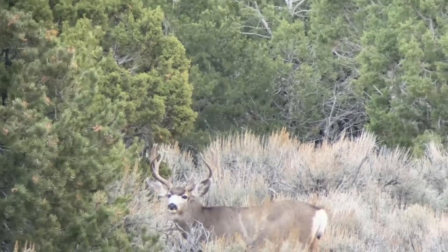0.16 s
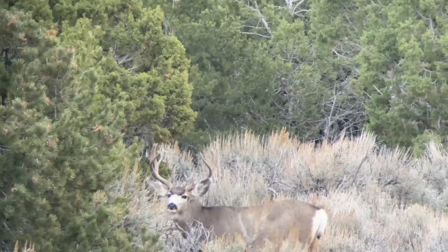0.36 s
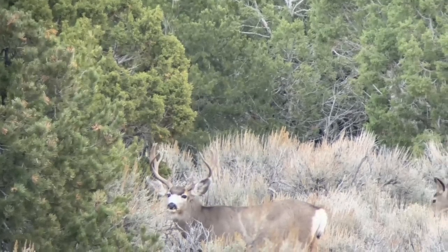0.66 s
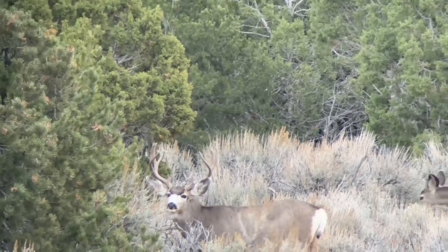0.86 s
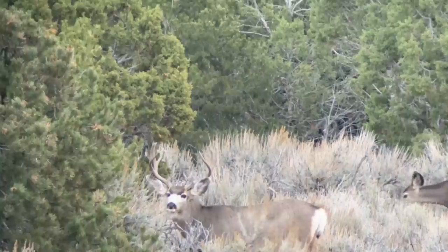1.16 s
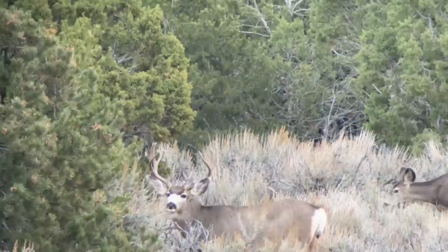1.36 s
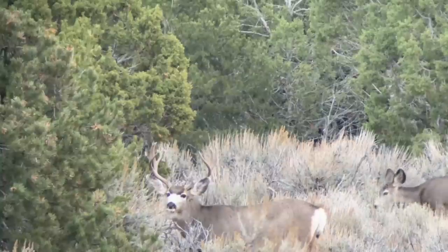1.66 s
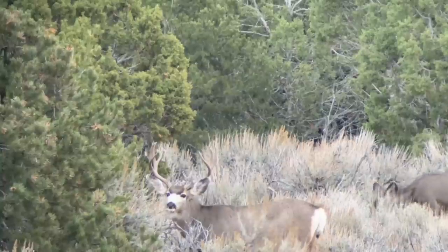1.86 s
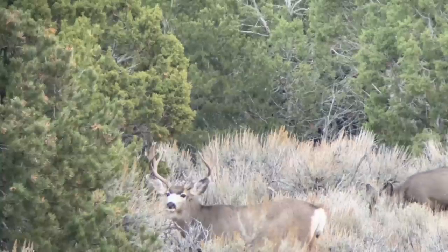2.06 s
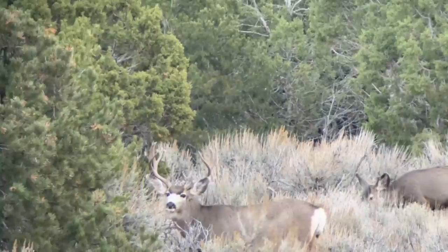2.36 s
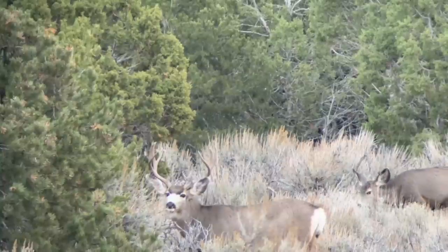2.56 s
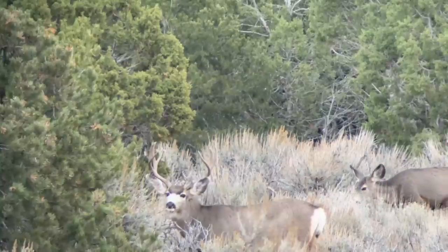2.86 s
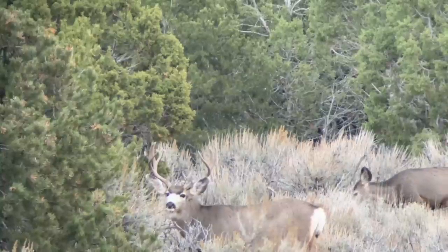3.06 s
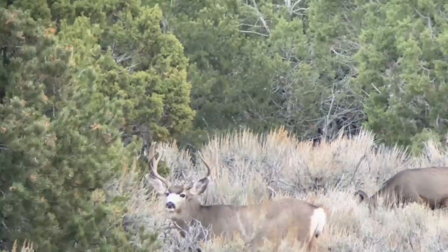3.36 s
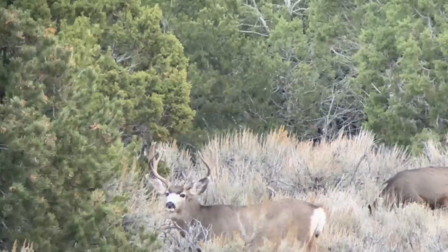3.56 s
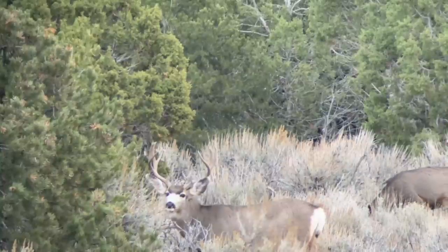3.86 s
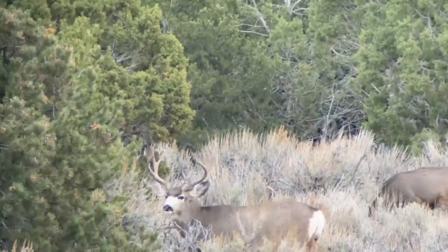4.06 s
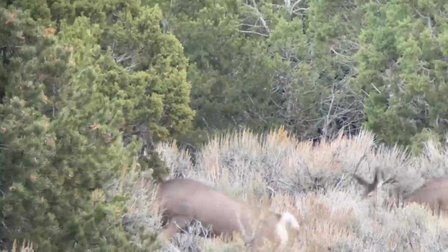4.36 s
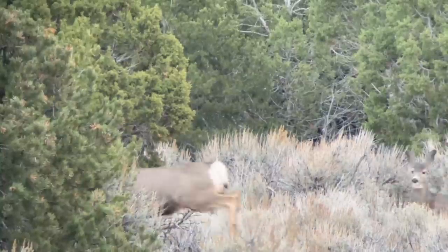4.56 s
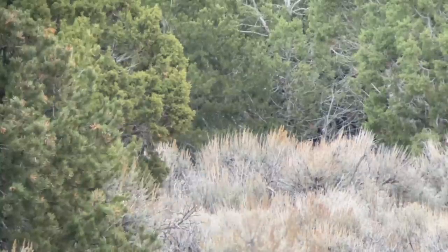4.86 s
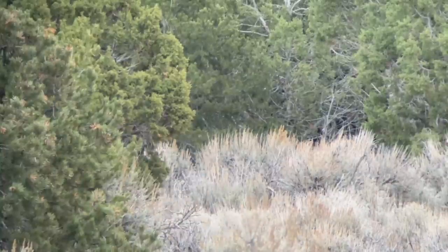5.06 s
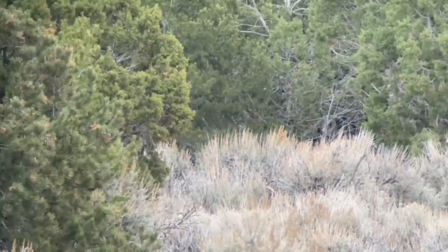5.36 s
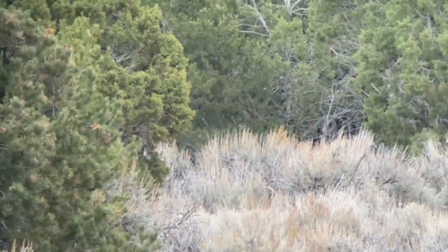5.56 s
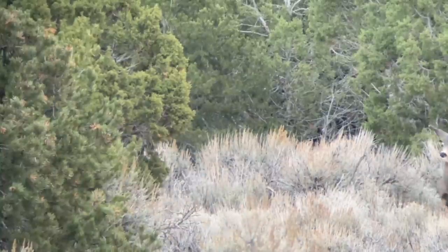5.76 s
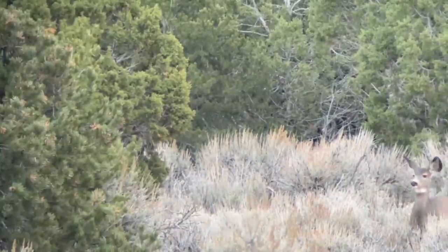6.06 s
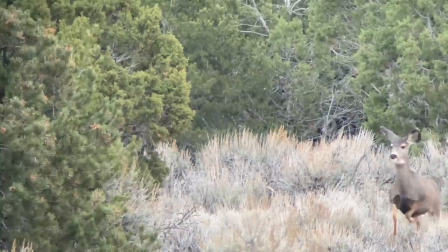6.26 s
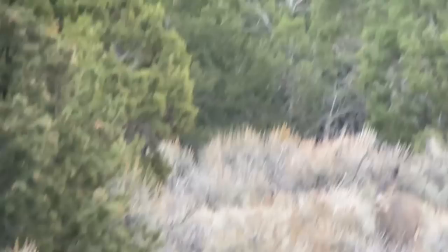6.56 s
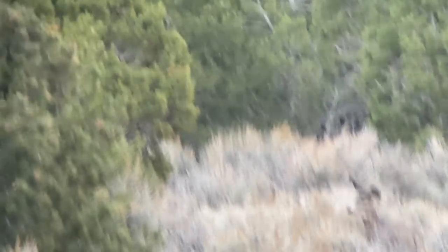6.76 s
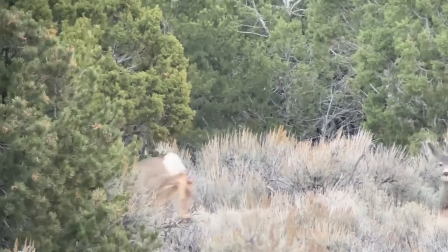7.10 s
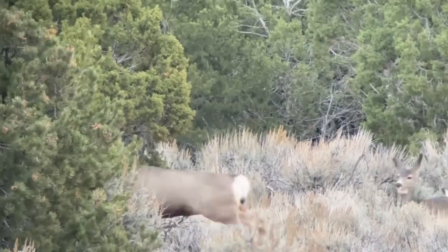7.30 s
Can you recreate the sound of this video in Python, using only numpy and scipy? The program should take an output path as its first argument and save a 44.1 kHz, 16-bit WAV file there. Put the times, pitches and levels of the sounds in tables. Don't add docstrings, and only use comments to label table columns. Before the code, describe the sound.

Outdoors in brushy country, a phone microphone picks up a steady idling engine and low wind bumps. One loud rifle shot snaps out, slightly clipped, with a deep boom and a scattering of woody, ringing reflections that fade into the idle. Later, fabric slides and rubs close to the microphone. In the last half second the background turns mono and softer, playing backwards.

```python
import sys
import numpy as np
from scipy import signal
from scipy.fft import rfft, irfft, next_fast_len
from scipy.io import wavfile
from scipy.ndimage import map_coordinates

SR = 44100
rng = np.random.default_rng(int(sys.argv[2]) if len(sys.argv) > 2 else 0)


def voltage_ratio(level):
    return 10 ** (np.asarray(level, float) / 20)


def output_pcm(signal):
    pcm = np.clip(np.atleast_2d(signal).T, -1, 1) * 32767
    wavfile.write(sys.argv[1], SR, np.round(pcm).astype(np.int16))


N = 327663
FIRED = 3.9323

# (frequency [Hz], level [dB per Hz])
TREES = [(1060, -35), (1700, -26), (1860, -20.5), (2050, -5), (2220, -6.5), (2410, -3), (2620, -1),
         (3000, -4), (3400, -10.5), (3770, -16), (4110, -21.5), (5000, -20.5), (6500, -29.5), (11000, -120)]
LEAVES = [(2940, -39), (4200, -6), (5000, -12), (6000, -18), (6800, 3), (7500, -6.5), (8500, -5),
          (9500, -9.5), (10500, -26), (12000, -44), (13500, -26), (15500, -44)]
ROCKS = [(720, -46), (1220, -13), (1370, -4), (1530, 3.5), (1750, -7), (1950, -8.5), (2540, -50.5),
         (4290, -120)]
# (frequency [Hz], right over left [dB], right phase lead [turns], likeness [0-1])
HIGH = [(2600, 0, -.08, .98), (3100, 0, -.09, .98), (4400, 0, -.03, .94), (5800, 0, -.04, .92),
        (6700, 0, -.1, .96), (7150, 0, -.22, .92), (7500, 0, -.51, .98), (7850, 0, -.82, .93),
        (8500, 0, -.97, .95), (9300, 0, -.86, .85), (9800, 0, -.72, .8), (10300, 0, -.5, .995),
        (12300, 0, -.5, .995), (13450, 0, 0, 1)]
# (frequency [Hz], right over left [dB], right phase lead [turns], likeness [0-1])
FAR_SIDE = [(50, 2.4, -1.007, 0.83), (400, 0.5, -1.05, 0.87), (690, 0.5, -1.0, 0.57),
            (930, 2.5, -.99, 0.94), (1200, 4.0, -0.75, 0.55), (1500, 5.4, -.95, 0.95),
            (1800, 4, -.48, 0.44), (2100, .4, 0.00073, 1.0)] + HIGH


def unit(x):
    return x / np.sqrt(np.mean(x ** 2) + 1e-20)


def along(points, hz):
    f, *cols = np.transpose(points)
    return [np.interp(np.log(hz + 1), np.log(f + 1), c) for c in cols]


def curves(rows, quiet=None):
    s, *cols = np.transpose(rows)
    return [np.interp(np.arange(N) / SR, s, c, quiet, quiet) for c in cols]


def wobble(rate):
    knots = rng.standard_normal(int(N * rate / SR) + 4)
    return map_coordinates(knots, [np.arange(N) * rate / SR])


def filtered(x, response):
    m = next_fast_len(N + SR // 2)
    return irfft(rfft(x, m) * response(np.fft.rfftfreq(m, 1 / SR)), m)[..., :N]


def coloured(x, spectrum):
    gain = lambda hz: voltage_ratio(along(spectrum, hz)[0])
    noise_power = np.mean(gain(np.linspace(0, SR / 2, num=8000)) ** 2)
    return filtered(x, gain) / np.sqrt(noise_power)


def resonant(modes):
    def response(f):
        total = 0
        for k, (centre, width, db) in enumerate(modes):
            damping = 1j * f * width
            total = total + (-1) ** k * voltage_ratio(db) * damping / (centre * centre - f * f + damping)
        return total
    return response


def pair():
    return rng.standard_normal((2, N))


def steer(x, side):
    def to_left(hz):
        return voltage_ratio(-along(side, hz)[0] / 2)

    def to_right(hz):
        db, turns, alike = along(side, hz)
        alike = np.clip(alike, 0, 1)
        return voltage_ratio(db / 2) * np.exp(2j * np.pi * turns) * [alike, np.sqrt(1 - alike ** 2)]
    return np.array([filtered(x[0], to_left), filtered(x, to_right).sum(0)])


def pings(rows, rise, fall, sag):
    s, db, hz = np.transpose(rows)[..., None]
    t = np.arange(-round(3 * rise * SR), round(3 * fall * SR)) / SR
    shape = voltage_ratio(db) * np.exp(-(t / np.where(t < 0, rise, fall)) ** 2 / 2)
    phase = 2 * np.pi * (rng.random((len(rows), 1)) + hz * (t - sag * t ** 2 / 2))
    at = (np.round(s * SR) + np.round(t * SR)).astype(int).ravel()
    return np.array([np.bincount(at, (shape * wave(phase)).ravel(), N) for wave in (np.cos, np.sin)])


def turned():
    start_s, long_s, loss_db = 5.62, 0.95, -4
    return voltage_ratio(loss_db * np.clip((np.arange(N) / SR - start_s) / long_s, 0, 1))


def engine():
    # (time [s], beat of the engine [Hz])
    shaft = [(0, 17.002), (2.5, 17.002), (2.9, 16.93), (5.8, 16.93), (6.2, 17.0), (7.5, 17.0)]
    # (time [s], level [dB])
    load = [(0, 0), (.3, -2), (1.2, 1.5), (1.8, -0.5), (2.59, 1), (3.08, -3.5), (3.28, 5), (3.45, 0),
            (3.57, -4), (3.77, -1), (3.95, 2), (4.1, -2), (4.69, 0), (6.18, -2), (6.32, 2), (6.67, -1),
            (6.87, 2), (7.05, -5.5)]
    # (multiple of the engine's beat, level [dB])
    weak_orders = [(2, -68), (11 / 3, -60), (5.27, -56), (6, -63), (10, -59.5)]
    cylinders = [13, 16.5, 12, 14.2, 9.9, 14.3]
    # (frequency [Hz], level [dB per Hz])
    clatter_tone = [(2310, -39.5), (3300, -5), (4000, -28), (4700, -1), (6000, -3), (6700, 3.5), (7500, 0),
                    (8100, 4), (8600, -12), (9500, -15), (10500, -6.5), (12000, -37.5), (13500, -29),
                    (15500, -24)]
    drone_tone = [(200, 0.0), (350, -3.5), (850, -6.5), (1300, -8.5), (1800, -10), (2100, -12),
                  (2500, -7.5), (2900, -13), (3200, -28), (4000, -24.5), (7500, -17.5), (10000, -31.5),
                  (12000, -43), (13200, -41), (14300, -31.5), (15500, -30.5)]
    # (frequency [Hz], right over left [dB], right phase lead [turns], likeness [0-1])
    engine_side = [(50, -21.5, 1.0, 0.96), (250, 4.0, 0.95, 0.87), (816, -6.5, 0.8, 0.85),
                   (1327, 2.0, 0.55, 0.75), (1900, 20.5, 0.093, 0.95), (1953, 2.0, 0.051, 0.65)] + HIGH

    cycle = .0503 + np.cumsum(curves(shaft)[0]) / SR / 3
    beat = 2 * np.pi * 3 * cycle
    load_db, = curves(load)
    third_db = -37.5 + load_db
    fourth_db = -42 - .4 * load_db + 2 * wobble(5.1)
    tones = voltage_ratio(third_db) * np.cos(3 * beat)
    tones += voltage_ratio(fourth_db) * np.cos(4 * beat - 2 * np.pi * .68)
    for order, db in weak_orders:
        tones += voltage_ratio(db + 1.3 * wobble(3.7)) * np.cos(order * beat + 0.25 * wobble(2.99))

    firing = 6 * cycle + 5.92
    since, number = firing % 1, firing.astype(int)
    uneven_db = 1.24 * rng.standard_normal(number[-1] + 1)[number]
    strength_db = np.array(cylinders)[number % 6] + uneven_db
    gate = voltage_ratio(strength_db) * since * np.exp(-since / 0.22)
    clatter = voltage_ratio(-57.5) * turned() * coloured(unit(gate) * pair(), clatter_tone)
    drone = voltage_ratio(-50 + 0.28 * wobble(9.3)) * turned() ** 0.15 * coloured(pair(), drone_tone)
    return np.sqrt(2) * tones * voltage_ratio([[-.3], [.3]]) + steer(clatter + drone, engine_side)


def wind():
    # (time [s], rise [dB], half length [s])
    gusts = [
        (0.266, 13, 0.045),
        (0.742, 12, 0.086),
        (1.73, -5, 0.039),
        (2.87, 0, 0.05),
        (3.25, 5.5, 0.032),
        (3.473, 1.5, 0.054),
        (5.494, 6.5, 0.026),
        (5.827, -2.5, 0.033),
        (6.325, 7.5, 0.066),
    ]
    # (frequency [Hz], level [dB per Hz])
    buffet = [(13, -41), (22, -10.5), (48, -6), (69, -5.5), (84, -5.5), (124, -12.5), (178, -16),
              (231, -29.5), (300, -41.5), (390, -37.5), (660, -120)]

    t = np.arange(N) / SR
    gusts_db = sum(db * np.exp(-((t - s) / half) ** 2) for s, db, half in gusts)
    wind_db = -50.5 + gusts_db + 2.5 * wobble(1.36) + wobble(14)
    wind_db = np.minimum(wind_db, -43.5)
    return steer(voltage_ratio(wind_db + 7.5) * turned() * coloured(pair(), buffet), FAR_SIDE)


def falling_boom(t):
    full_s, top_s = .0048, .0107
    swell_db = -1.5 - 990 * np.clip(top_s - t, 0, None)
    swell_db -= 23000 * np.clip(full_s - t, 0, None)
    swell_db -= 1190 * np.clip(t - top_s, 0, None)
    return voltage_ratio(swell_db) * (t > 1e-4) * np.cos(9.1 * np.log(t / .0109))


def ground_thud(t):
    # (frequency [Hz], level [dB], time to fall 60 dB [s])
    ground = [(444, -2.3, .021), (652, -15.5, .046), (1000, -6.5, .013)]
    late_s, rise_s = .00146, .0009
    ringing = sum(voltage_ratio(db - 60 * t / t60) * np.cos(2 * np.pi * hz * (t - late_s)) for hz, db, t60 in ground)
    thud = ringing * np.clip(t / rise_s, 0, 1) ** 2
    return thud + voltage_ratio(-14.5) * np.roll(thud, -round(.0182 * SR))


def brush_spray(fronts, edges):
    fading = voltage_ratio(-60 * np.arange(SR // 20) / SR / 0.018)

    def scatter(x, spectrum):
        return coloured(signal.fftconvolve(x, fading)[:N] * rng.standard_normal(N), spectrum)
    spray = voltage_ratio(-36.0) * scatter(fronts, TREES)
    spray += voltage_ratio(-39.0) * scatter(fronts, ROCKS)
    return spray + voltage_ratio(-39.5) * scatter(edges, LEAVES)


def shot():
    # (time [s], peak [dB], treble [dB])
    cracks = [
        (3.9138, -1.5, -24),
        (3.9172, -12, -24),
        (3.9319, .5, -6),
        (3.93303, -6, -2),
        (3.9352, -20, 10),
        (3.9368, -9.5, -9),
        (3.951, -23, -12),
        (3.9578, -17, -1),
    ]
    # (frequency [Hz], width [Hz], level [dB])
    snap = [(2690, 350, 3), (1500, 250, -11), (3450, 440, -34)]
    whip = [(2500, 360, 6), (1450, 310, 0), (4950, 410, -15), (8500, 900, -17)]
    edge = [(4660, 500, -5), (6650, 300, 1.5), (8970, 1400, -3.5), (14000, 1800, -36)]
    # (frequency [Hz], level [dB])
    dip = [(220, 0), (290, -8.5), (370, -1), (450, 0), (9900, 0), (10700, -22), (11500, -22), (12200, -4),
           (15500, -6)]
    # (frequency [Hz], right over left [dB], right phase lead [turns], likeness [0-1])
    shot_side = [(50, .5, -1, 1), (200, .5, -1, 1), (330, 5, -.98, 1), (520, 1, -.96, 1), (950, 3, -.97, 1),
                 (1200, 8, -.75, 1), (1500, 7, -.9, 1), (1800, 5, -.52, 1), (2100, -3, -.1, 1)] + HIGH

    fronts, edges = np.zeros((2, N))
    for s, db, treble_db in cracks:
        fronts[round(s * SR)] = voltage_ratio(db + 19.5)
        edges[round(s * SR)] = voltage_ratio(db + treble_db + 16.0)
    whips = fronts * (np.arange(N) < (FIRED - .01) * SR)
    body = filtered(fronts - whips, resonant(snap)) - filtered(whips, resonant(whip))
    body = filtered(body, lambda hz: 1 / (1 + 1j * hz / 6000))
    t = np.clip(np.arange(N) / SR - FIRED, 1e-4, None)
    blast = body + filtered(edges, resonant(edge)) + falling_boom(t) + ground_thud(t)
    blast = blast + brush_spray(fronts, edges)
    blast = filtered(blast, lambda hz: voltage_ratio(along(dip, hz)[0]))
    return steer(np.array([blast, 0 * blast]), shot_side)


def roll():
    # (time [s], level [dB])
    rolling = [(3.95, -17), (3.97, -23.5), (4.04, -28.5), (4.25, -30), (4.28, -30), (4.335, -37),
               (4.6, -33.5), (4.72, -39.5), (5.2, -44)]
    # (frequency [Hz], level [dB per Hz])
    deep_tone = [(35, -36), (60, -17), (70, -8), (107, -3.5), (170, -7.5), (220, -38), (370, -120)]
    upper_tone = [(80, -120), (140, -42), (165, -7.5), (192, 14), (235, -4.5), (265, -8.5), (310, -51),
                  (500, -120)]
    knock_tone = [(160, -49.5), (280, -21.5), (328, -7.5), (414, 1), (450, -12.5), (553, -3), (800, -18.5),
                  (1040, -40), (1760, -120)]
    # (time [s], level [dB], frequency [Hz])
    slope_thumps = [(3.988, -19, 160), (4.0112, -25, 180), (4.049, -25, 186), (4.0722, -26, 200),
                    (4.0838, -24, 104), (4.1448, -23.5, 148), (4.1854, -29, 118), (4.2144, -28.5, 178),
                    (4.2405, -39, 88), (4.2812, -21, 132), (4.3102, -29, 141), (4.3508, -36, 154),
                    (4.3741, -38, 121), (4.4234, -32.5, 150), (4.464, -31.5, 103), (4.4902, -29, 122),
                    (4.5569, -29, 130), (4.6034, -51, 295), (4.6382, -32, 138), (4.1, -27, 181),
                    (4.164, -27, 215)]
    # (frequency [Hz], right over left [dB], right phase lead [turns], likeness [0-1])
    roll_side = [(60, .5, 0, 0.97), (220, 0.67, 0.013, 0.99), (500, 0.86, 0.011, 0.49)]

    swell = np.clip((np.arange(N) / SR - 3.96) / .03, 0, 1)
    deep_db, = curves(rolling, quiet=-120)
    after = np.arange(N) / SR - rolling[0][0]
    upper_db = deep_db + 5.5 - 22 * after
    knock = voltage_ratio(-24.5 - 60 * after.clip(0) / 0.19) * (after > 0)
    knock = knock + swell * voltage_ratio(deep_db - 22.5)
    rumble = voltage_ratio(deep_db) * coloured(pair(), deep_tone) + voltage_ratio(upper_db) * coloured(pair(), upper_tone)
    thumps = voltage_ratio(2) * pings(slope_thumps, rise=0.005, fall=0.0066, sag=6.5)
    low = thumps + voltage_ratio(-4) * swell * rumble + knock * coloured(pair(), knock_tone)
    return steer(low, roll_side)


def shares(s, colour, narrow_db):
    parts_db = -narrow_db * (np.arange(4) - colour) ** 2
    return parts_db + [0, 0, 0, -13 + narrow_db - 31 * (s - FIRED)]


def returns():
    # (time [s], level [dB], rise [s], time to fall 60 dB [s],
    # colour [0 slopes, 1 rocks, 2 trees, 3 leaves])
    stands = [(3.945, -23, 0.0028, 0.032, 0.45), (3.95, -26, 0.012, 0.32, 3.1),
              (3.957, -42.5, 0.0074, 0.76, 0.66), (4.023, -33, 0.23, 1.85, 2.08),
              (4.2, -28.5, 0.2, 0.63, 1.77), (4.28, -31.5, 0.035, 0.87, 1.48),
              (4.375, -38.5, 0.11, 0.82, 1.25), (4.43, -41.5, 0.099, 1.2, 1.25),
              (4.49, -31.5, 0.047, 0.63, 0.76), (4.533, -30.5, 0.033, 0.4, 1.06),
              (4.575, -33, .04, .15, 3.2), (4.633, -26, 0.018, 0.056, 1.55),
              (4.644, -28.5, 0.052, 0.028, .5), (4.679, -53, 0.033, 4.4, 0.42),
              (4.743, -50, .02, 0.04, 1.5), (4.841, -45, 0.093, 0.93, 0.69)]
    t, power = np.arange(N) / SR, np.zeros((4, N))
    for s, db, rise, t60, colour in stands:
        shape_db = db - 20 * np.clip(s - t, 0, None) / rise - 60 * np.clip(t - s, 0, None) / t60
        power += voltage_ratio(2 * shape_db) * (t > FIRED) * voltage_ratio(2 * shares(s, colour, 5.5))[:, None]
    return np.sqrt(power)


def echoes():
    # (frequency [Hz], level [dB per Hz])
    slopes = [(260, -63), (450, -12.5), (630, -2), (741, -10), (809, 2), (1110, 7.5), (1280, -2),
              (1660, -44), (2820, -120)]
    # (time [s], peak [dB], colour [0 slopes, 1 rocks, 2 trees, 3 leaves])
    slaps = [(4.149, -34, 2.3), (4.179, -25, 1.9), (4.194, -34.5, 0.66), (4.212, -19, 2.4),
             (4.226, -17, 1.6), (4.252, -20, 1.9), (4.27, -27, 1.8), (4.28, -30.5, 1.7), (4.294, -33, 1.7),
             (4.307, -25, 1.65), (4.336, -26, 1.3), (4.422, -33, 1.2), (4.504, -27.5, 0.68),
             (4.505, -33, 2.3), (4.533, -38, 1.2), (4.554, -25.5, 2), (4.578, -34.5, 0.62),
             (4.625, -28, 1.7), (4.63, -17, 0.11), (4.64, -29.5, .1), (4.737, -36, 0.6),
             (4.777, -38.5, 1.3), (4.808, -35, 0.92), (4.845, -34, 0.64), (4.867, -41, 0.57),
             (4.887, -39, .95), (4.928, -43, 1.1), (5.031, -38, 1.7)]
    # (time [s], level [dB],
    # frequency [Hz])
    glints = [(3.9857, -33, 2600), (3.9927, -29, 2830), (3.9988, -28, 2760), (4.018, -27, 2570),
              (4.0286, -28.4, 2900), (4.0551, -32, 2560), (4.0792, -30, 2380), (4.0841, -34, 2630),
              (4.0943, -35, 2680), (4.1355, -36, 2780), (4.1355, -30, 1500), (4.1408, -31, 2630),
              (4.1478, -29, 1580), (4.1522, -28, 2330), (4.16, -34, 2600), (4.169, -33, 2380),
              (4.1816, -22.5, 2290), (4.1829, -36, 1300), (4.1878, -28, 2880), (4.1898, -37, 1550),
              (4.1947, -34, 2290), (4.1988, -32, 1500), (4.2053, -33, 2580), (4.2057, -29, 1450),
              (4.2155, -32, 1480), (4.2159, -28, 2740), (4.222, -25, 1500), (4.2265, -18.5, 2580),
              (4.2347, -29, 2830), (4.2473, -26.5, 1460), (4.2539, -22, 2630), (4.2547, -24.5, 1500),
              (4.2718, -24, 1460), (4.2731, -25, 2410), (4.2796, -30, 1410), (4.2808, -24, 2510),
              (4.2869, -25, 2710), (4.2914, -23.5, 2600), (4.2963, -24.5, 2700), (4.3033, -28, 2670),
              (4.3086, -22, 2470), (4.3094, -34, 1570), (4.3192, -25.5, 1430), (4.3229, -22, 2780),
              (4.3265, -24, 2500), (4.3367, -25.5, 2460), (4.3371, -27, 1480), (4.362, -31.5, 1480),
              (4.3624, -28, 2530), (4.3714, -30.5, 2410), (4.3763, -31, 1480), (4.378, -32.5, 2650),
              (4.3829, -31, 2400), (4.3841, -29, 1480), (4.3918, -27, 2490), (4.3955, -32, 1510),
              (4.42, -34.5, 2360), (4.4254, -32.5, 1430), (4.4263, -32, 2530), (4.434, -26.5, 1470),
                  (4.435, -37.0, 2520), (4.4406, -34, 2440), (4.4617, -37, 1510), (4.4702, -30, 1460),
                  (4.477, -36.5, 1440), (4.4838, -38.5, 1520), (4.4877, -31, 1000), (4.494, -29, 1520),
                  (4.505, -27.5, 1024), (4.5243, -28.5, 1420), (4.5332, -24, 1620), (4.5337, -27, 2950),
                  (4.546, -27, 1540), (4.5462, -31.5, 2330), (4.556, -31.5, 2770), (4.5567, -31, 1610),
                  (4.567, -31, 1430), (4.5726, -32, 2880), (4.5742, -33.5, 1480), (4.5801, -34, 1006),
                  (4.5873, -40, 1400), (4.595, -37, 1520), (4.594, -34, 950), (4.617, -32, 1630),
                  (4.6313, -31, 2530), (4.631, -26, 3020), (4.633, -23.5, 1115), (4.6415, -34, 950),
                  (4.7068, -43, 1400), (4.7253, -43, 2540), (4.739, -32, 1550), (4.778, -35.5, 1410),
                  (4.8003, -46, 1600), (4.813, -39, 1460), (4.823, -40, 1540), (4.833, -49, 1000),
                  (4.839, -36, 1530), (4.846, -31.5, 1510), (4.859, -43, 1450), (4.8685, -37, 1400),
                  (4.887, -38.5, 1500), (4.8943, -42, 1420), (4.9025, -39, 1400), (4.9298, -42.5, 1380),
                  (4.931, -45, 2710), (4.9433, -46, 1480), (4.9527, -47, 1550), (4.9622, -49, 1400),
                  (5.0078, -51, 950), (5.0226, -49, 1460), (5.0351, -41, 1410), (5.0351, -43, 2590),
              (4.0642, -35, 3400), (4.1107, -37, 3200), (4.1277, -36.5, 3100), (4.141, -39, 3800),
                   (4.179, -30, 3610), (4.186, -34, 3300), (4.217, -27, 3300), (4.226, -42, 4300),
                   (4.254, -34, 4100), (4.27, -33, 3600), (4.29, -34, 3600), (4.32, -32, 3350),
                   (4.4746, -45, 3160), (4.5032, -40, 3540), (4.504, -43.5, 4230), (4.5228, -43, 3070),
                   (4.555, -43, 3500), (4.5634, -36, 2100), (4.581, -37, 3050), (4.593, -43, 2800),
                   (4.625, -31, 2900), (4.632, -45.5, 4400), (4.638, -33, 2900), (4.645, -39, 2900),
                   (4.6315, -35, 1810), (4.546, -36, 2050), (4.227, -27, 1700), (4.181, -33, 1900),
                   (4.3, -37, 2050), (3.958, -30, 3770), (4.739, -36.5, 1050), (4.778, -42, 1100),
                   (4.808, -41, 970), (4.849, -43, 2640), (4.738, -48, 3230), (4.894, -44, 2720),
                   (4.548, -34, 1020), (4.522, -37, 1000), (4.632, -32.5, 760), (4.68, -47, 2950)]

    hits = (rng.random(N) < 300 / SR) * voltage_ratio(1.5 * rng.random(N))
    puff = np.exp(-np.arange(600) / (0.0062 * SR))
    grain = unit(4 + signal.fftconvolve(hits, puff)[:N])
    levels = voltage_ratio(-1.5) * returns() * grain
    fronts = np.zeros_like(levels)
    t = np.arange(400) / SR
    late = (0.00228 * SR * rng.random((len(slaps), 4))).astype(int)
    for (s, db, colour), lag in zip(slaps, late):
        i, sizes = round(s * SR), voltage_ratio(db + shares(s, colour, 11))
        levels[:, i:i + len(t)] += voltage_ratio(-9.5) * sizes[:, None] * np.exp(-t / 0.0065)
        fronts[range(4), i + lag] = voltage_ratio([15.4, 8, 14.7, 4.5]) * sizes
    rows = glints
    echo = pings(rows, rise=0.0014, fall=0.0022, sag=3)
    echo = echo + voltage_ratio(-1.5) * pings(rows, rise=0.00031, fall=.0004, sag=3)
    noise = pair()
    for level, front, spectrum in zip(levels, fronts, (slopes, ROCKS, TREES, LEAVES)):
        echo = echo + coloured(level * noise + front, spectrum)
    return steer(echo, FAR_SIDE)


def cloth():
    # (time [s], rub [dB], half length [s], sheen over rub [dB])
    sleeve = [
        (5.232, -65, .08, -4),
        (5.45, -70, .3, -6),
        (6.02, -77, .4, 5),
        (6.3, -77, .2, 4),
        (6.464, -58, 0.048, -13),
        (6.571, -52, 0.037, -20),
        (6.683, -57.5, 0.027, -12),
        (6.886, -52.5, 0.043, -14),
        (6.925, -50, 0.072, -19),
    ]
    # (frequency [Hz], level [dB per Hz])
    fabric = [(1750, -46), (2500, -10), (3500, -12.5), (5000, -7), (6500, -5), (7500, 1.5), (8500, -2),
              (9500, -5.5), (10500, -8), (11500, -25), (12500, -12), (14000, -22), (15500, -23)]
    sheen = [(11500, -49), (12600, -4), (14000, 0), (15600, 7), (16000, -53)]

    s, db, half, sheen_db = np.transpose(sleeve)[..., None]
    strokes = voltage_ratio(2 * (db - 7.9 * ((np.arange(N) / SR - s) / half) ** 2))
    rub = np.sqrt(strokes.sum(0))
    gloss = np.sqrt((strokes * voltage_ratio(2 * sheen_db)).sum(0))
    return steer(rub * coloured(pair(), fabric) + gloss * coloured(pair(), sheen), FAR_SIDE)


def scene():
    change_s, mirror_s = 7.0, 525337 / SR
    live = engine() + wind() + shot() + roll() + echoes() + cloth()
    t = np.arange(N) / SR
    backwards = np.clip(round(mirror_s * SR) - np.arange(N), 0, N - 1)
    rewound = voltage_ratio(-3.5) * live.mean(0)[backwards]
    fade_out = np.clip((change_s + 0.022 - t) / 0.048, 0, 1)
    fade_in = np.clip((t - change_s) / 0.02, 0, 1)
    return live * fade_out + rewound * fade_in


def roll_off(x):
    return signal.sosfilt(signal.butter(12, 16300, fs=SR, output="sos"), x)


def record(dry):
    # (frequency [Hz], level [dB])
    overall_tone = [(18, -24), (30, -7.5), (42, -1), (10300, -0.5), (10800, -8), (11800, -17.5), (12300, 2),
                    (15700, -2), (15900, -52)]
    held = dry / (1 + np.abs(dry / .97) ** 8) ** (1 / 8)
    mix = filtered(held, lambda hz: voltage_ratio(along(overall_tone, hz)[0]))
    return roll_off(mix)


dry = scene()
out = record(dry)
output_pcm(out)
```